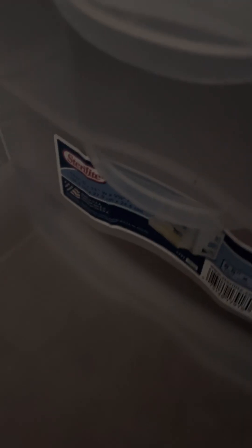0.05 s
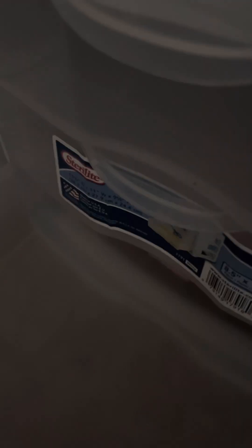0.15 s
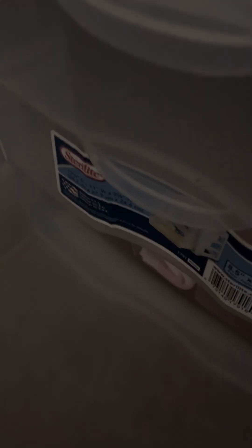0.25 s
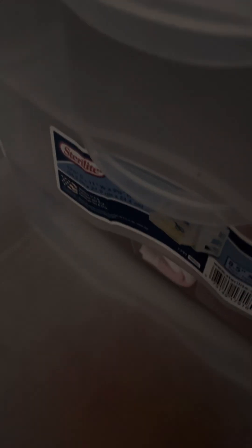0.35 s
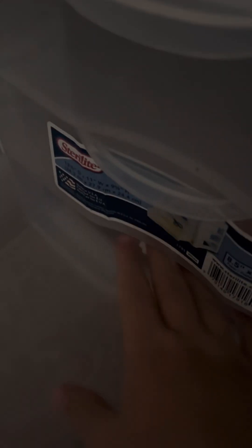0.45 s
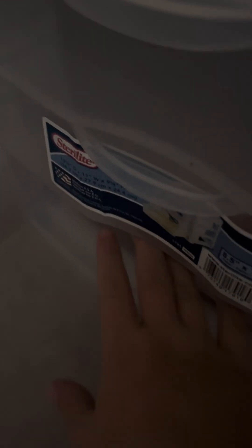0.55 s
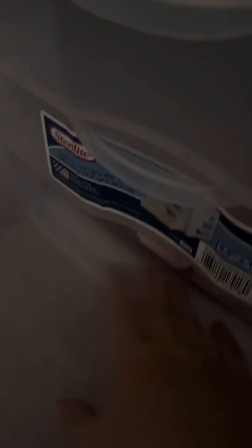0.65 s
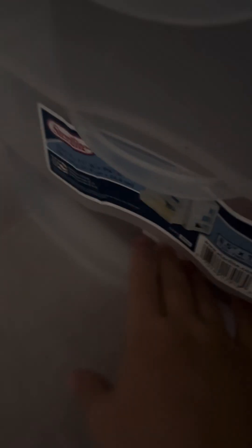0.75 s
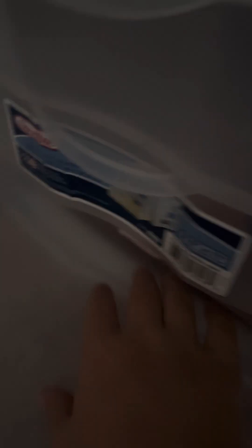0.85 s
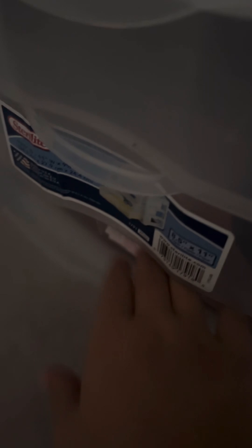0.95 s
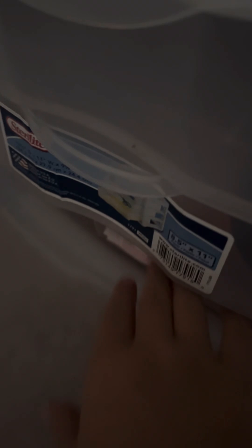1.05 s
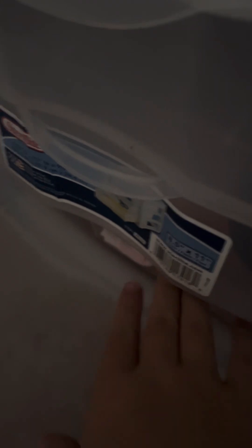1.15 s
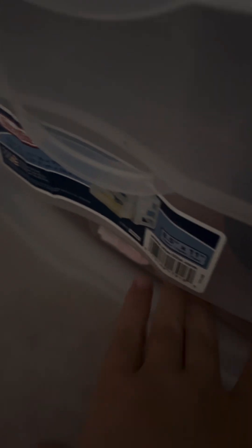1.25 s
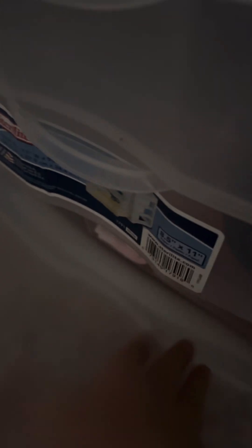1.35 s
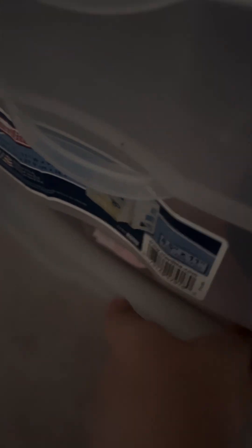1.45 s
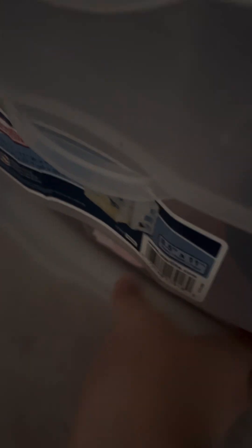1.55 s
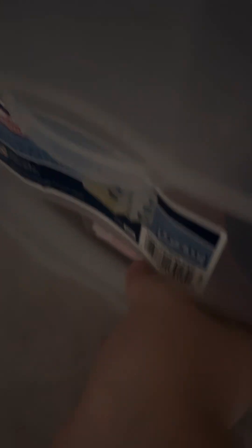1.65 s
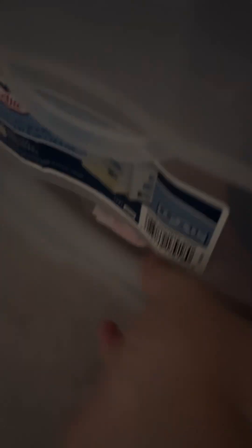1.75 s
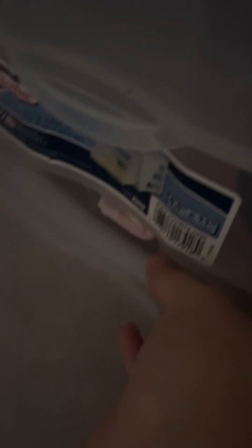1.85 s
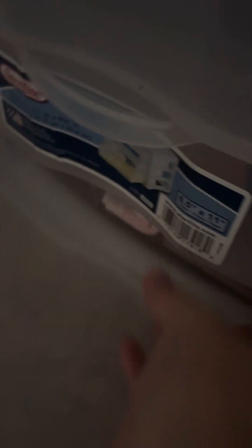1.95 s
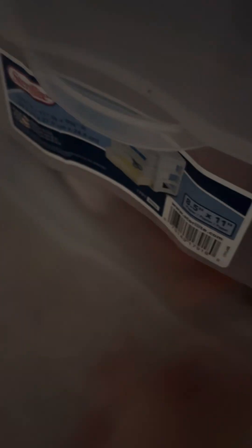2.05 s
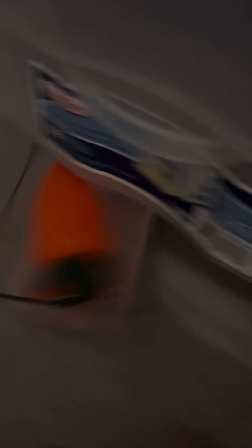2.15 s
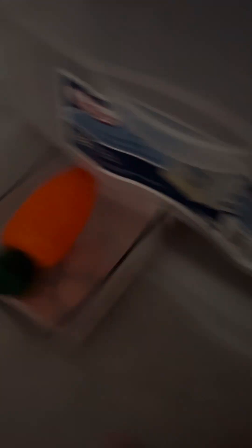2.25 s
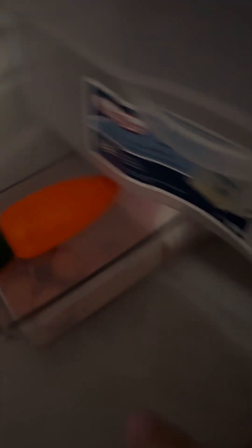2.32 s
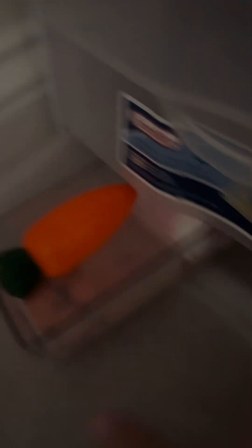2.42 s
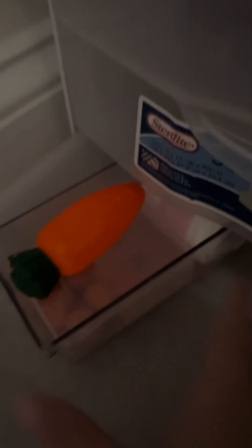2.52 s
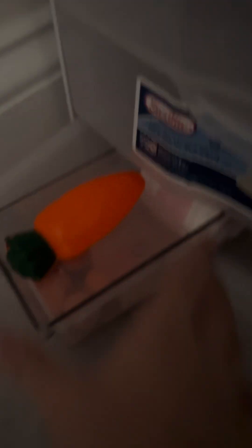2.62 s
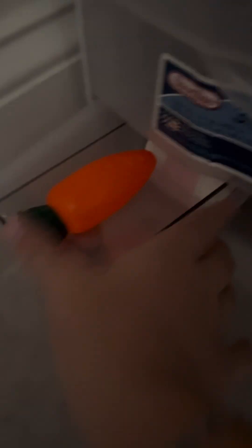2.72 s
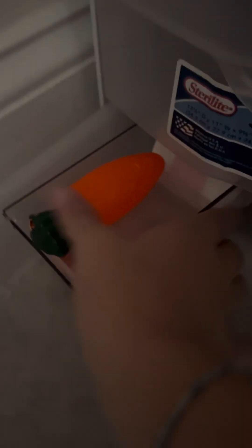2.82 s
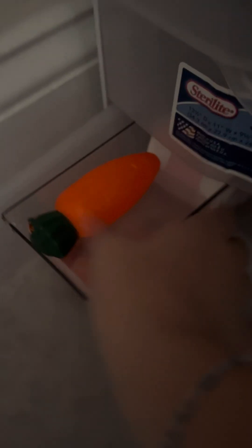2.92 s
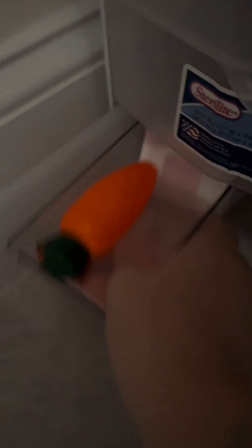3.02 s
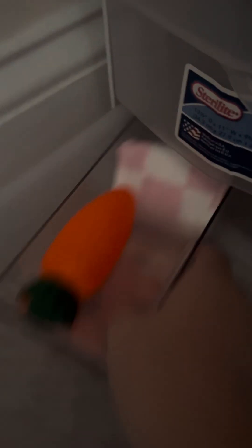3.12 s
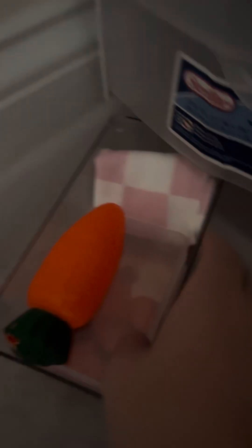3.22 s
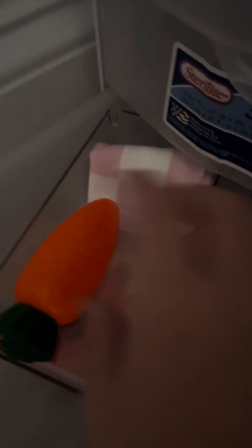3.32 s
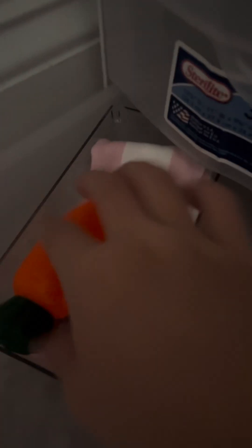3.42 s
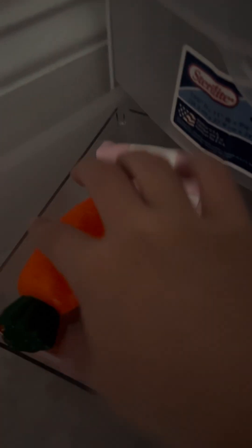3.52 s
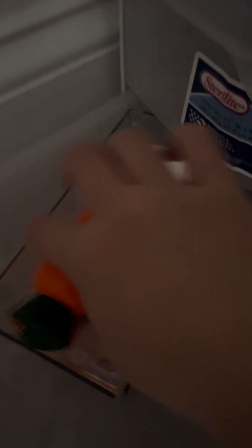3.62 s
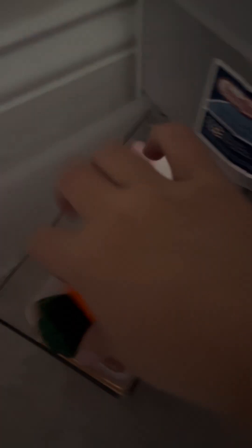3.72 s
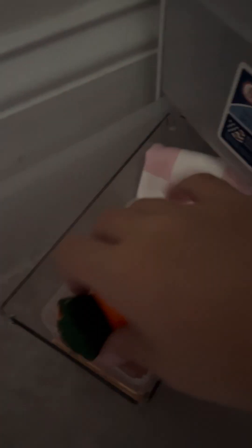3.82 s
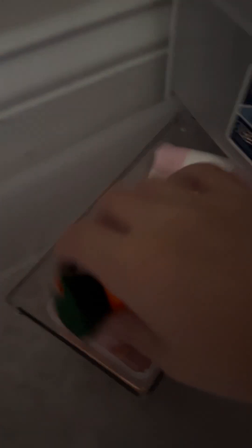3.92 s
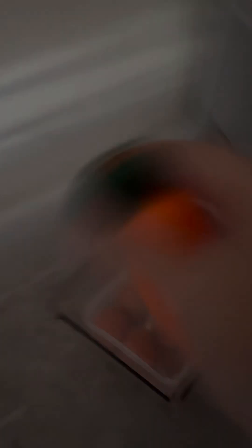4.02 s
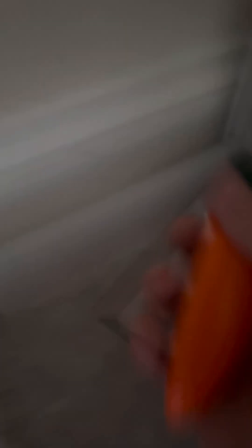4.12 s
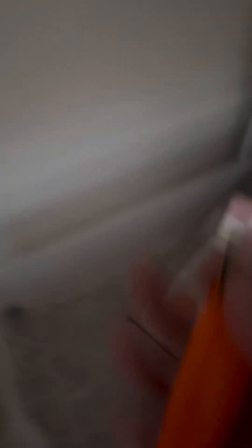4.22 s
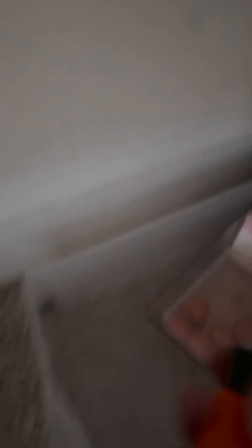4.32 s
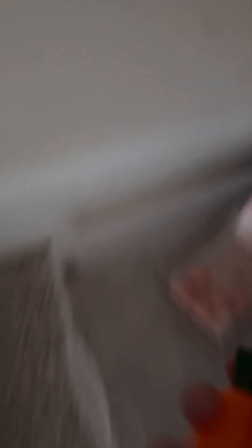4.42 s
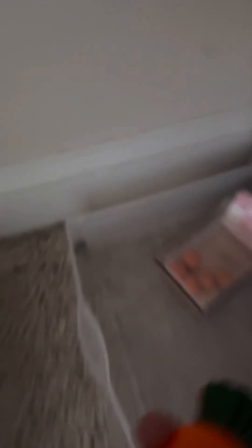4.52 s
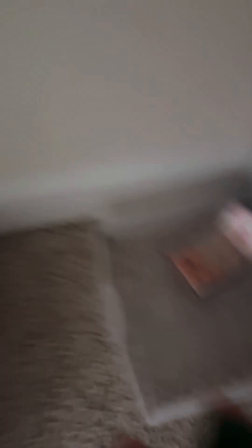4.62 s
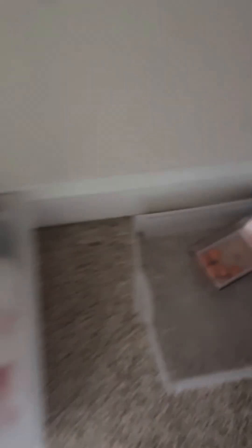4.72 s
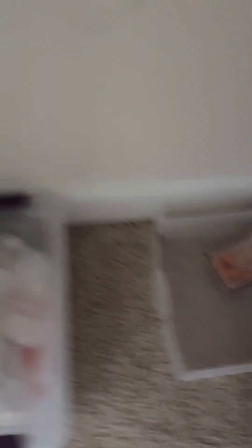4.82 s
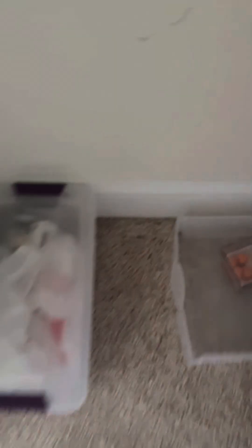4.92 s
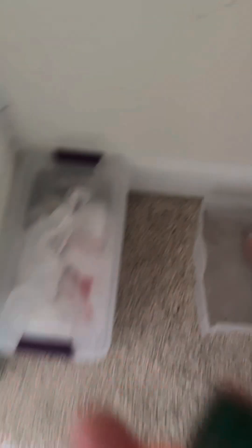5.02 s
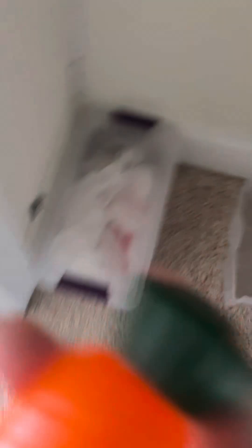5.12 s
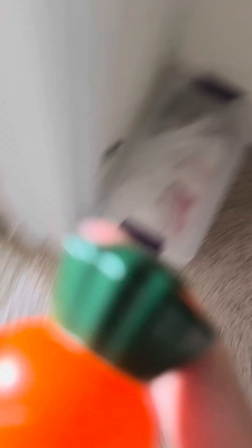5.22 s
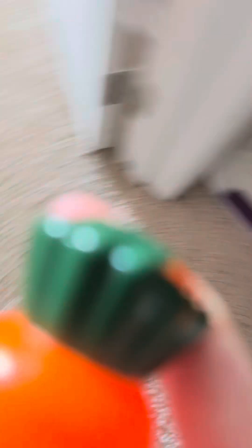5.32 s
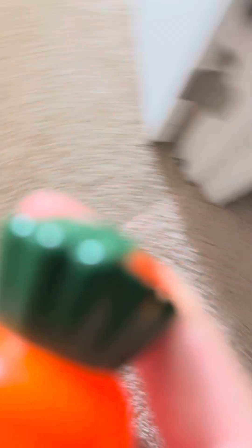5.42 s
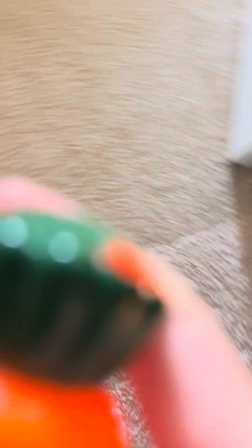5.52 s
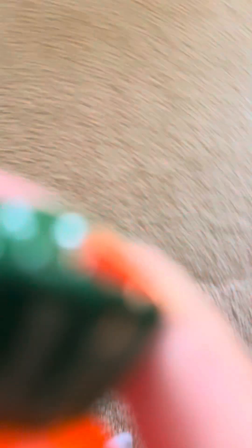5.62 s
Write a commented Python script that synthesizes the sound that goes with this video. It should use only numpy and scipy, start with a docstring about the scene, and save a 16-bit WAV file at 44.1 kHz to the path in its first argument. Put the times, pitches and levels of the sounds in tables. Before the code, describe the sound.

Close stereo sound of thin plastic handled indoors, dry with a short dull tail. Light knocks and scrapes come first, with a heavier bump just before two seconds, then a rapid burst of hard rattling blows. Lighter, brighter clacks of a hollow toy against its tray follow, with tiny squeaks, fading to sleeve rustle, soft handling bumps and steady room hush.

```python
"""A hand works a plastic drawer loose: knocks, judders and booms, with rubbing and light touches between.
Near 2 s it drags out in a dense run of hard blows; from 2.7 s toys clack in a small tray and briefly squeak.
After 4 s soft brushing, faint touches and a few low thuds remain over the steady hush of the room.
Blows are noise bursts and clean tones through plastic resonances; rubbing is friction noise and tiny slips.
Thuds are sagging tones; a short dull tail and two unlike microphone ports place it all close by."""
import sys
import numpy as np
from scipy import signal
from scipy.fft import rfft, irfft, next_fast_len
from scipy.io import wavfile
from scipy.ndimage import uniform_filter1d, minimum_filter1d

SR = 44100
rng = np.random.default_rng(int(sys.argv[2]) if len(sys.argv) > 2 else 0)


def log_audio(samples):
    """Write samples as a 16-bit WAV file to the path given in sys.argv[1]."""
    # one column per channel
    frames = np.atleast_2d(samples).T
    # limit to full scale, then quantise
    limited = np.clip(frames, -1, 1)
    pcm = np.round(limited * 32767).astype(np.int16)
    wavfile.write(sys.argv[1], SR, pcm)


N = 250043

# Drawer on its frame; level per octave at 750 Hz over 10 ms before source gain, colours relative to it:
# start_s, level_db, bass_db, clack_db, tick_db, nominal_t60_s, spot_hz, second_hz
DRAWER_BLOWS = [ (.029, -40, -3, -4.5, -19, 0.024, 1550, 3250), (.105, -37, -13, -16, -21, 0.034, 990, 610),
                (.157, -39.5, -1.5, -3, -7.5, 0.029, 1000, 710),
                (.379, -46.5, -9, -6, -14, 0.023, 1490, 1000), (.385, -45, 12, -7, 1.5, 0.035, 393, 1110),
                (.417, -39, -23, -2, -15, 0.05, 1160, 1700), (.435, -40, 18, 9, 5.5, 0.024, 1670, 1115),
                (.458, -39.5, 4.5, -4.5, -14, 0.032, 1020, 1660),
                (.676, -44, 8.5, -5.5, -7, 0.06, 1040, 5060),
                (.810, -38, -8, -7.5, -14.5, 0.035, 1030, 720), (.85, -50.5, 2, -6, 6, .022, 1000, 3500),
                (.917, -47, 1, -6, -20, 0.049, 1057, 2020), (.933, -44.5, -4, -6, -20, 0.045, 940, 1440),
                (.961, -61.5, 7, -8, 5, 0.02, 1000, 2510),
                (1.299, -44.5, 7.5, -6.5, -13.5, 0.038, 530, 1650),
                (1.414, -45, -3, 5, -6, 0.052, 1004, 4670),
                (1.4215, -44.5, 8.5, 0.5, -0.5, 0.047, 394, 1060),
                (1.716, -49, -16.5, -2, -4, 0.069, 1220, 900), (1.77, -33, 8, 11.5, 4.5, 0.034, 5350, 1732),
                (1.828, -39.5, -3, -10, -21.5, 0.051, 470.5, 792),
                (1.970, -23.5, -7, -4.5, -18, 0.068, 1580, 1072),
                (2.007, -27.5, -9, -1, -10, 0.059, 734, 3314),
                (2.0222, -29, -15.5, 8, 3.5, 0.0084, 3390, 3102),
                (2.0232, -13, -17, -21.5, -31, 0.0086, 789, 572),
                (2.026, -19.5, -7, -17.5, -22, 0.0088, 560, 1145),
                (2.044, -27, -6.5, -2.5, -4, 0.03, 1580, 455),
                (2.053, -31, 2, -0.5, -17, 0.047, 1630, 2284),
                (2.06, -32.5, -3.5, -8.5, -16, 0.012, 440, 1585),
                (2.07, -36, -4, 0, -15.5, 0.044, 1550, 2294),
                (2.099, -30.5, -22.5, -2, -4.5, 0.028, 1160, 3335),
                (2.117, -26, 2, -9.5, -18.5, .022, 980, 460),
                (2.127, -28.5, 1.5, 1, -6.5, 0.065, 970, 2620),
                (2.133, -31, -2.5, -2.5, -11.5, 0.017, 1130, 1450),
                (2.149, -32, 4.5, 0.5, -8, .035, 1285, 2146), (2.164, -35, -5.5, -7, -15, 0.021, 720, 1205),
                (2.1785, -16.5, -17, -5, -9.5, 0.019, 2790, 4110),
                (2.1815, -23.5, -2.5, -13, -20, .018, 420, 737),
                (2.184, -19, -8.5, 4.5, -5, 0.038, 1396, 2640), (2.195, -31, 0.5, 0, -7, 0.035, 1134, 5455),
                (2.213, -32, -2.5, 5.5, -3.5, 0.031, 1240, 1983),
                (2.252, -38.5, -17, -3, -20, 0.042, 706, 2004),
                (2.269, -43.5, -5.5, 2.5, -1, 0.034, 1900, 1257),
                (2.3195, -20, -3.5, -9, -16, 0.03, 586, 2490),
                (2.3295, -16, -6, -4.5, -3.5, 0.016, 432, 2443),
                (2.341, -31, -2, 1, -15.5, 0.063, 1280, 2037), (2.354, -30.5, 3, -5, -8, 0.055, 442, 1230),
                (2.365, -37, 8.5, 2, -5.5, 0.036, 1960, 1298),
                (2.392, -31, -11.5, 0, -3.5, 0.029, 2080, 514),
                (2.407, -41, -3, 4.5, -15, 0.053, 1680, 4220),
                (2.467, -42.5, -5.5, -1, -7, 0.058, 1263, 428),
                (2.572, -45.5, -2, 3, -17, 0.069, 420, 1740), (2.619, -43, -9, -10.5, -24, 0.02, 700, 1320)]
# Toys and their tray: start_s, level_db, bass_db, clack_db, tick_db, nominal_t60_s, spot_hz, second_hz
TOY_BLOWS = [ (2.762, -36.5, -14.5, -4.5, -20, 0.022, 579, 2287),
             (2.985, -36.5, 3.5, -4.5, -39, 0.019, 1060, 375.5), (3.04, -45.5, 1, 5, -8, 0.02, 515, 4120),
             (3.0735, -39.5, 2, 9, -4.5, 0.012, 3770, 1830),
             (3.0765, -28.5, -13.5, -2.5, -18, 0.023, 576, 844),
             (3.102, -46.5, 0, -12, -12, 0.032, 546, 900), (3.151, -37.5, -3, 2, -12.5, 0.087, 661, 2750),
             (3.181, -42.5, 4.5, 9, -7, 0.019, 1940, 2650), (3.1955, -28, -8, 1, -6.5, 0.021, 559, 3540),
             (3.4145, -25.5, -5, -3.5, -3, 0.029, 1980, 1134),
             (3.4435, -33, -1.5, 6.5, 3.5, 0.029, 1106, 1994),
             (3.4495, -21, -7.5, -4, -2.5, 0.024, 1965, 1037), (3.46, -31, -2.5, 1, -11, 0.049, 2060, 381),
             (3.5015, -36.5, -7, -26.5, -35.5, 0.018, 470, 1060),
             (3.582, -43, 4.5, 1, 4, 0.038, 1480, 5460), (3.604, -31, 0, 2, -1.5, 0.063, 1150, 5300),
             (3.612, -35, -8, 14, -2.5, 0.021, 5320, 1066), (3.713, -40, -9.5, 7, 8.5, .05, 5730, 1950),
             (3.726, -27.5, -12.5, 9.5, 5, 0.023, 1890, 5160),
             (3.731, -32.5, -4, 0, -12.5, 0.033, 1500, 1000),
             (3.805, -40.5, -2.5, -19.5, -32, 0.023, 717, 1060),
             (3.8442, -37.5, -11, 11, -9.5, 0.06, 1820, 1730), (3.901, -48, 2.5, -1, -5, 0.038, 1870, 480),
             (4.002, -50.5, -30, 12, 1.5, 0.077, 1296, 1663),
             (4.041, -39.5, -9.5, -14, -10, 0.022, 524, 1284),
             (4.183, -74.5, -17, 25.5, -30, 0.027, 1986, 1900),
             (4.556, -51, -2.5, -5.5, -6.5, 0.044, 1870, 480),
             (5.006, -57.5, -1.5, -0.5, 0, 0.02, 1430, 2114), (5.391, -60, -25.5, -8, -4, .035, 1167, 4600)]
# Pushes that flex a drawer wall or the camera case: start_s, nominal_peak_db, nominal_pitch_hz, t60_s
WALL_PUSHES = [(0.048, -34, 165.3, 0.24), (0.386, -23, 174.5, 0.086), (0.442, -28.5, 145, 0.088),
               (.921, -27.5, 183, 0.071), (0.956, -33, 122, 0.21), (1.307, -23.5, 125.3, 0.12),
               (1.42, -31.5, 182, 0.14), (1.776, -18.5, 130, 0.085), (2.128, -26, 138, 0.096),
               (2.335, -28.5, 89, 0.4), (2.994, -34, 202.4, 0.063), (3.621, -36, 81, .14),
               (5.022, -43.5, 56.5, 0.21), (5.141, -36, 54.2, 0.14), (5.206, -36.5, 69.8, 0.23),
               (5.274, -37, 58.6, 0.25), (5.305, -43.5, 87, 0.098)]
# Drawer resonances: mode_hz, width_hz, above_dense_rest_db
DRAWER_SHELL = [(200, 19, 2.5), (332, 60, 4), (400, 60, 2), (540, 79, 8.5), (775, 150, 4.5), (1115, 63, 4),
                (1140, 33, 5), (1213, 35, 4.5), (1605, 41, 3), (2040, 66, 5), (2660, 120, 4.5),
                (3180, 200, 3.5), (4100, 150, 8), (4940, 1400, 8), (7950, 720, 0.5)]
# Toy and tray resonances: mode_hz, width_hz, above_dense_rest_db
TOY_SHELL = [(410, 70, 5.2), (483, 60, 8.6), (530, 77, 6.1), (895, 270, 1.4), (1020, 160, 4.8),
             (1290, 17, 5.6), (1583, 39, 2), (1962, 93, 9.8), (2220, 60, 7.9), (2760, 440, 7.7),
             (3520, 97, 3.1), (4370, 490, 7.9), (5120, 480, 7.8), (8070, 430, 6.4)]
# Plastic or skin sliding on plastic, before source gain; rumble and hiss relative to scrape:
# start_s, length_s, scrape_db_per_octave, rumble_db, hiss_db
SLIDES = [(0, 0.047, -56.5, 11, -22), (0.062, 0.078, -49.5, 4.5, -16), (0.16, 0.12, -60, 5, -37),
          (0.396, 0.096, -51, 10, -18), (0.513, 0.12, -62.5, 9, -23), (0.664, 0.19, -57.5, 5, -14),
          (0.908, 0.063, -57, 16, -8.5), (0.983, 0.13, -55.5, -2, -28), (1.243, 0.018, -53.5, -5, -13),
          (1.27, 0.068, -59.5, 7, -27), (1.416, 0.079, -45, -10, -21.5), (1.523, 0.095, -54, -7, -21),
          (1.787, 0.064, -36.5, -1, -19.5), (1.909, 0.094, -55.5, -6, 2.5),
          (1.962, 0.21, -36.5, -5.5, -8.5), (2.218, 0.2, -44, -5, -10.5), (2.33, 0.068, -39, 2, -13.5),
          (2.548, 0.049, -49.5, -18, -17.5), (2.706, 0.095, -53.5, 1, -19), (2.789, 0.065, -49, -25, -20),
          (2.867, 0.12, -52.5, -20, -14), (3.009, 0.17, -51.5, 6, -16), (3.199, 0.029, -45.5, -9, -8),
          (3.407, .008, -41.5, -16, -12.5), (3.45, 0.032, -37.5, -5, -12), (3.561, 0.07, -43, -7, -15),
          (3.654, 0.088, -52.5, -7.5, 6), (3.74, 0.083, -52, 7.5, -9.5), (3.967, 0.13, -69, 5, 6.5)]
# Hand resting on plastic under the strokes: time_s, scrape_db_per_octave
RESTING_HAND = [(0, -79.5), (1.1, -66.5), (2.6, -60.5), (3.8, -65.5), (4.15, -91), (5.67, -89.5)]
# Skin and sleeve passing: fullest_s, half_width_s, level_at_3_khz_db, tilt_db_per_octave
SLEEVE_PASSES = [(.02, .03, -57, 4.5), (.09, 0.043, -53.5, 1.5), (.2, 0.021, -60, 1.5),
                 (1.565, 0.029, -49, .5), (2.831, 0.027, -46.5, -4), (2.92, 0.031, -46.5, -0.5),
                 (3.029, 0.068, -52.5, -1), (3.125, 0.046, -50.5, 0), (3.222, 0.0096, -43.5, -2.5),
                 (4.089, 0.051, -64.5, 4.5), (4.23, 0.051, -63, 1.5), (4.389, 0.053, -58, 3),
                 (4.61, 0.079, -63, -0.5), (4.745, 0.033, -61, -1), (5.06, .06, -66, -1),
                 (5.22, 0.058, -62, -1.5), (5.43, .06, -73, 0.5)]
# Brush spectrum: frequency_hz, level_db_per_hz
BRUSH_COLOUR = [(100, -11.5), (400, 0.5), (1000, -2), (2000, -2.5), (4500, -4), (8000, -12.5),
                (13000, -16.5), (16000, -22)]
# Toy against tray: start_s, length_s, level_db, mean_pitch_hz
TOY_SQUEAKS = [(3.595, 0.019, -35.5, 1980), (3.65, 0.065, -46, 1973), (3.663, .055, -47.5, 1242),
               (3.881, 0.025, -40.5, 1904)]
# Fingertips and nails on plastic: start_s, level_db (before source gain)
FINGER_TAPS = [(.064, -49.5), (.217, -56), (0.244, -53), (.324, -56.5), (.533, -45.5), (0.556, -54.5),
               (0.633, -52.5), (.698, -49), (.886, -51), (.961, -54.5), (1.169, -53), (1.28, -58),
               (1.593, -52.5), (1.937, -43.5), (1.958, -41), (2.382, -39), (2.426, -43.5), (2.509, -49),
               (2.711, -44.5), (2.738, -45.5), (2.944, -44), (3.273, -47), (3.314, -51.5), (3.338, -56),
               (3.361, -54), (3.662, -46.5), (3.757, -44.5), (3.884, -49.5), (4.531, -63.5), (4.609, -58),
               (4.637, -65), (5.444, -65.5), (5.487, -67)]
# Still air spectrum: frequency_hz, level_db_per_hz
AIR_COLOUR = [(25, -8.5), (55, 10), (110, -4.5), (220, -17.5), (450, -28), (700, -22.5), (1020, -10.5),
              (1600, -22.5), (2700, -31), (5000, -35.5), (9000, -37.5), (13500, -37.5), (16000, -51.5)]
# Ports, phase: frequency_hz, left_lead_rad
PORT_LEAD = [(0, 0), (600, -1.1), (1290, -0.0), (1720, -0.1), (2670, 2.5), (3620, 1.0), (4050, 0.9),
             (4570, 1.8), (5080, 1.5), (5770, 3.0), (6800, 4.1), (7410, 5.9), (8960, 6.9), (9730, 9.3),
             (10900, 9.5), (11800, 12.1), (13500, 13.2), (14000, 15.4), (15600, 15.9), (16200, 15.1)]
# Ports, shading: frequency_hz, left_minus_right_db
PORT_SHADE = [(100, -0.5), (400, -0.3), (680, -2.5), (1150, -6), (1500, -1), (2000, 0), (3050, -2.5),
              (4100, 0.5), (4600, -4), (5600, 0.5), (12000, 0.5)]
# Octave band centres: centre_hz
BAND_HZ = 62.5 * 2 ** np.arange(9)

PLAIN_T60_S = 0.033  # longer blows are glancing, shorter ones square
# Tap colour relative to its level
TAP_BASS_DB, TAP_CLACK_DB, TAP_TICK_DB, TAP_T60_S = -0.5, -8, -18, 0.031
# Edges catching as they slide: level relative to the stroke, tick relative to its hiss
CATCHES_PER_S, CATCH_T60_S = 26, 0.022
CATCH_DB, CATCH_SPREAD_DB, CATCH_BASS_DB, CATCH_CLACK_DB, CATCH_TICK_DB = -12, 1, -2.5, 3, -1.5
TRAY_FROM_S = 2.4  # rubbing excites the tray, not the drawer, from here
EASE_DB = -4  # change from start to end of a stroke
# Stroke edges at 750 Hz for a stroke of PLAIN_STROKE_S; longer strokes are more gradual
PLAIN_STROKE_S, GRIP_S, RELEASE_T60_S = 0.08, 0.0046, 0.07
BASS_LAG_POWER = 0.15  # wide walls lag, treble follows sooner
TOUCH_RUMBLE_DB, TOUCH_HISS_DB = 6.5, -14  # relative to the resting scrape
AIR_DB = -59
EDGE_HZ = 16400


def knocks(rows, modes, level_db, boom_db, top_db, ring_db, ring_t60_s, rise_cycles, hold_s, damping,
           spot_db, echo, tone_db, tone_t60_s, second_db=5.0, second_tone_db=-6, glance_db=4, snap=5,
           spot_width_hz=110, spot_q=14, apart=0.24, size=8192):
    """Blows send bending waves through thin plastic: treble rises and dies first; square blows ring cleaner."""
    t = np.arange(size) / SR
    hz = np.fft.rfftfreq(size, 1 / SR)
    out = np.zeros((2, N))
    bands, body, centre = octaves(hz), shell(modes, hz), BAND_HZ[:, None]
    first_touch = snap * np.exp(-2j * np.pi * hz * 0.0013)  # one hard impulse, 1.3 ms in
    dying = np.minimum(2 * (1 - t / t[-1]), 1) ** 2  # fade to zero at the buffer end
    for s, db, bass, clack, tick, t60, spot_hz, second_hz in rows:
        glance = t60 / PLAIN_T60_S
        loose_db = glance_db * np.log2(glance)  # glancing: more rattle, less tone
        blow_db = level_db + db
        # the contact chatters briefly, then lets go
        rise = 1 - np.exp(-(t / (0.001 * glance + rise_cycles / centre)) ** 2)
        age = np.maximum(t - hold_s * glance, 0) * (0.15 + centre / 1500) ** damping
        burst = amp(-60 * age / t60)
        ring = amp(ring_db + min(loose_db, 0) - 60 * age / ring_t60_s)
        contact = rfft(pair(rng.standard_normal((2, size)), apart)) + first_touch
        waves = irfft(contact[:, None] * bands) * rise * (burst + ring)
        waves = irfft(rfft(waves) * body * echoes(hz, echo))
        waves /= np.sqrt((waves ** 2).mean(0).sum(1, keepdims=True) / (SR / 100))  # rms 1 over 10 ms
        colour = [(62, bass + boom_db), (250, bass), (750, 0.0011), (2500, clack),
                  (8000, tick), (16000, tick + top_db)]
        blow = (waves * amp(blow_db + read(colour, BAND_HZ))[:, None]).sum(1)
        # the spot struck favours two modes
        favoured = [(spot_hz, spot_db), (second_hz, second_db)]
        spot = shell([(f, spot_width_hz + f / spot_q, lift) for f, lift in favoured], hz)
        tones = sum(amp(read(colour, f) + lift) * clean_ring(t, f, tone_t60_s * glance ** 1.1)
                    for f, lift in [(spot_hz, 0), (second_hz, second_tone_db)])
        add(out, s, irfft(rfft(blow) * spot) * dying)
        add(out, s + 0.0008, amp(blow_db + tone_db - max(loose_db, 0)) * tones * dying)
    return out


def clean_ring(t, hz, t60_s, rise_cycles=1.1):
    """One mode swings up and dies away; energy equals rms 1 over 10 ms."""
    envelope = (1 - np.exp(-(t * hz / rise_cycles) ** 2)) * amp(-60 * t / t60_s)
    swing = envelope * np.sin(2 * np.pi * (hz * t + rng.random()))
    return swing / np.sqrt(np.sum(swing ** 2) / (SR / 100))


def echoes(hz, gain, count=2):
    """Walls a hand's length away comb the spectrum, differently for each blow."""
    delays_s = rng.uniform(0.0005, 0.003, count)
    return 1 + sum(gain * np.exp(-2j * np.pi * hz * delay_s) for delay_s in delays_s)


def catches():
    """Rows of small knocks at random along each stroke; level and brightness follow the stroke."""
    rows = []
    for s, length, db, _, hiss in SLIDES:
        slots = np.arange(0, length, 1 / CATCHES_PER_S)
        for slot, (late, size, spot, second) in zip(slots, rng.random((32, 4))):
            at = slot + late / CATCHES_PER_S
            if at >= length:
                continue
            level_db = db + CATCH_DB + CATCH_SPREAD_DB * (2 * size - 1)
            rows.append((s + at, level_db, CATCH_BASS_DB, CATCH_CLACK_DB + hiss / 2, CATCH_TICK_DB + hiss,
                         CATCH_T60_S, 500 * 2 ** (2 * spot), 1200 * 2 ** (2 * second)))
    return rows


def taps():
    """Rows of light touches, each exciting another random spot of the wall."""
    spots = rng.random((len(FINGER_TAPS), 2))
    return [(s, db, TAP_BASS_DB, TAP_CLACK_DB, TAP_TICK_DB, TAP_T60_S,
             1000 * 2 ** (spot - 0.5), 450 * 2 ** (2 * second))
            for (s, db), (spot, second) in zip(FINGER_TAPS, spots)]


def thuds(rise_s=0.0062, sag=0.12, overtone=1.6, overtone_db=-5, wobble=0.082):
    """A wide wall bulges and swings back; its pitch sags unevenly as the push eases."""
    t, out = np.arange(SR // 3) / SR, np.zeros((2, N))
    for s, db, hz, t60 in WALL_PUSHES:
        bend = sag * (2 * np.exp(-t / 0.032) - 1) + wobble * unevenness(len(t))
        angle = 2 * np.pi * np.cumsum(hz * (1 + bend)) / SR
        envelope = (1 - np.exp(-(t / rise_s) ** 2)) * amp(-60 * t / t60)
        upper = amp(overtone_db - 30 * t / t60) * np.sin(overtone * angle + 2 * np.pi * rng.random())
        add(out, s, amp(db) * envelope / envelope.max() * (np.sin(angle) + upper))
    return out


def rubbing(level_db=-1, slips_per_s=1100, spread_db=2.0, smooth=0.54, judder_db=0.45, patchy_db=2.0,
            echo=0.37, apart=0.055):
    """Tiny slips and smooth friction drive the walls; uneven pressure wakes now one range, now another."""
    size = next_fast_len(N)
    t, hz = np.arange(size) / SR, np.fft.rfftfreq(size, 1 / SR)
    slip_gain = amp(spread_db * np.minimum(rng.exponential(1, size), 3))
    slips = (rng.random(size) < slips_per_s / SR) * slip_gain
    friction = rng.standard_normal((2, size)) * (smooth + unit(slips))
    drive = friction * amp(judder_db * unevenness(size, order=240))
    push = rfft(moving_echoes(pair(drive, apart), echo))
    drawer = irfft(push * shell(DRAWER_SHELL, hz), size)
    tray = irfft(push * shell(TOY_SHELL, hz), size)
    wave = rfft(np.where(t < TRAY_FROM_S, drawer, tray))
    times = t[::64]
    out = np.zeros((2, size))
    for band, centre in zip(octaves(hz), BAND_HZ):
        gain = np.interp(t, times, pressure(times, centre))
        out += unit(irfft(wave * band, size)) * gain * amp(patchy_db * unevenness(size))
    return amp(level_db) * out[:, :N]


def pressure(t, centre_hz, sub_db=-3.0, presence_db=2, top_db=-5):
    """How strongly the strokes and the resting hand drive one octave."""
    def colour(rumble, hiss):
        """Scrape colour in dB at this octave."""
        points = [(62, rumble + sub_db), (135, rumble), (850, 0.0016),
                  (4200, hiss + presence_db), (14000, hiss + top_db)]
        return read(points, centre_hz)

    lag = max(750 / centre_hz, 0.5) ** BASS_LAG_POWER
    resting_db = np.interp(t, *np.transpose(RESTING_HAND))
    power = amp(resting_db + colour(TOUCH_RUMBLE_DB, TOUCH_HISS_DB)) ** 2
    for s, length, db, rumble, hiss in SLIDES:
        age = np.maximum(t - s, 0)
        along = np.minimum(age / length, 1)
        slow = lag * np.sqrt(length / PLAIN_STROKE_S)
        grip = 0.5 + 0.5 * np.tanh((t - s) / (GRIP_S * slow))
        ease_db = EASE_DB * (along - 0.5)
        release_db = -60 * np.maximum(age - length, 0) / (RELEASE_T60_S * slow)
        power += (grip * amp(db + ease_db + release_db + colour(rumble, hiss))) ** 2
    return np.sqrt(power)


def moving_echoes(x, gain, delay_s=0.0016, drift=0.3, count=2):
    """Reflections off near walls shift as the hand moves."""
    at = np.arange(x.shape[1])
    delays = [delay_s * SR * np.exp(drift * unevenness(len(at), order=10000)) for _ in range(count)]
    return x + gain * sum(x[:, np.maximum(at - np.round(delay).astype(int), 0)] for delay in delays)


def brushes(patchy_db=1.76, echo=0.37, apart=0.061):
    """Smooth friction noise swells and fades with each pass of skin or sleeve."""
    size = next_fast_len(N)
    t, hz = np.arange(N) / SR, np.fft.rfftfreq(size, 1 / SR)
    times = t[::64]
    friction = moving_echoes(pair(rng.standard_normal((2, size)), apart), echo)
    hiss = rfft(friction) * amp(read(BRUSH_COLOUR, hz))
    hiss /= np.sqrt(np.mean(irfft(hiss, size) ** 2))
    out = np.zeros((2, N))
    for band, centre in zip(octaves(hz) ** 2, BAND_HZ):
        power = sum(amp(db + tilt * np.log2(centre / 3000)) ** 2 * np.exp(-((times - s) / width) ** 2)
                    for s, width, db, tilt in SLEEVE_PASSES)
        gain = np.interp(t, times, np.sqrt(power))
        out += irfft(hiss * band, size)[:, :N] * gain * amp(patchy_db * unevenness(N))
    return out


def squeaks(width_hz=130, sag=0.03):
    """Stick and slip keep one toy mode ringing unevenly; it sinks as the grip eases."""
    out, pole = np.zeros((2, N)), np.exp(-np.pi * width_hz / SR)
    for s, length, db, hz in TOY_SQUEAKS:
        along = np.linspace(0, 1, round(length * SR))
        slips = rng.standard_normal((2, SR // 5))
        swing = signal.lfilter([1], [1, -2 * pole, pole ** 2], slips[0] + 1j * slips[1])
        swing = swing[-len(along):]  # settled part
        turn = np.exp(2j * np.pi * np.cumsum(hz * (1 + sag * (0.5 - along))) / SR)
        add(out, s, amp(db) * unit((swing * turn).real * np.sqrt(along * (1 - along))))
    return out


def air(apart=0.44):
    """The steady hush of the house: coloured noise."""
    noise = rfft(pair(rng.standard_normal((2, N)), apart))
    colour = amp(read(AIR_COLOUR, np.fft.rfftfreq(N, 1 / SR)))
    return amp(AIR_DB) * unit(irfft(noise * colour, N))


def room(x, wet_db=-20, t60_s=0.14, dull_hz=4500):
    """Carpet and near walls give a short, dull tail of decaying noise."""
    t = np.arange(SR // 2) / SR
    tail = rng.standard_normal((2, len(t))) * amp(-60 * t / t60_s) * (t > 0.005)
    tail /= np.linalg.norm(tail[0])
    tail = signal.sosfilt(signal.butter(1, dull_hz, fs=SR, output="sos"), tail)
    return amp(wet_db) * signal.oaconvolve(x, tail, axes=1)[:, :N]


def ports(x, mono_hz=260):
    """The case delays and shades sound differently at its two ports; long waves reach both more alike."""
    size = next_fast_len(N + SR // 10)
    hz = np.fft.rfftfreq(size, 1 / SR)
    lead = np.interp(hz, *np.transpose(PORT_LEAD))
    shade = amp(read(PORT_SHADE, hz))
    response = np.array([shade * np.exp(0.5j * lead), np.exp(-0.5j * lead)])
    z = rfft(x, size) * response / np.sqrt((1 + shade ** 2) / 2)
    mid = z.mean(0)
    return irfft(mid + (z - mid) * np.clip(hz / mono_hz, 0.5, 1), size)[:, :N]


def amp(db):
    """Decibels to gain."""
    return 10 ** (np.asarray(db) / 20)


def unit(x):
    """Scales to rms 1."""
    return x / np.sqrt(np.mean(x ** 2) + 1e-24)


def read(points, hz):
    """Reads (Hz, value) points on a log-frequency axis."""
    f, value = np.transpose(points)
    return np.interp(np.log(hz + 1), np.log(f + 1), value)


def add(mix, s, sound):
    """Mixes a sound in at a time in seconds."""
    part = mix[:, max(round(s * SR), 0):][:, :sound.shape[-1]]
    part += sound[..., :part.shape[1]]


def octaves(hz):
    """Overlapping octave bands whose powers sum to one."""
    away = np.log2(np.maximum(hz, 1) / BAND_HZ[:, None])
    return np.cos(np.pi / 2 * np.clip(away, -1, 1))


def shell(modes, hz):
    """Response of a plastic shell: a few resonances stand out of many."""
    return 1 + sum((amp(db) - 1) / (1 + 2j * (hz - f) / width) for f, width, db in modes)


def pair(z, apart):
    """Two ports hear nearly the same wave."""
    return np.array([z[0] + apart * z[1], z[0] - apart * z[1]])


def unevenness(size, order=400):
    """Slow random swells of rms 1: noise averaged twice over about `order` samples."""
    return unit(uniform_filter1d(uniform_filter1d(rng.standard_normal(size), order), order // 2))


def scene():
    """Drawer, toys and hand, close by in a quiet room."""
    # taps and catches ring the drawer resonances throughout
    drawer = knocks(DRAWER_BLOWS + taps() + catches(), DRAWER_SHELL, level_db=-3.5, boom_db=-19.5,
                    top_db=-14, ring_db=-16.5, ring_t60_s=0.18, rise_cycles=0.4, hold_s=0.0018,
                    damping=0.23, spot_db=8.0, echo=0.32, tone_db=4.5, tone_t60_s=0.024)
    toys = knocks(TOY_BLOWS, TOY_SHELL, level_db=-3, boom_db=-27.0,
                  top_db=-11.5, ring_db=-16.5, ring_t60_s=0.092, rise_cycles=0.44, hold_s=0.0012,
                  damping=0.18, spot_db=8.5, echo=0.27, tone_db=5.5, tone_t60_s=0.026)
    near = drawer + toys + thuds() + rubbing() + brushes() + squeaks()
    return ports(near + air() + room(near))


def record(dry, low_cut_hz=32, ceiling_db=-1, recovery_db_per_s=250):
    """Rolls off the bass, limits the hardest peaks and cuts the top of the band."""
    thinned = signal.sosfilt(signal.butter(2, low_cut_hz, "high", fs=SR, output="sos"), dry)
    peak_db = 20 * np.log10(abs(thinned).max(0) + 1e-9)
    over_db = np.maximum(peak_db - ceiling_db, 0)
    over_db = -minimum_filter1d(-over_db, size=65)  # looks a moment ahead
    fall_db = np.arange(N) * recovery_db_per_s / SR
    held_db = np.maximum.accumulate(over_db + fall_db) - fall_db
    limited = thinned / amp(uniform_filter1d(held_db, size=65))
    low_pass = signal.firwin(301, EDGE_HZ, window=("kaiser", 9), fs=SR)
    return signal.oaconvolve(limited, low_pass[None], "same", axes=1)


dry = scene()
out = record(dry)
log_audio(out)
```